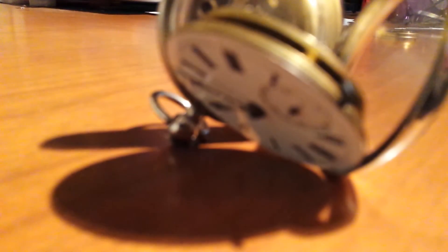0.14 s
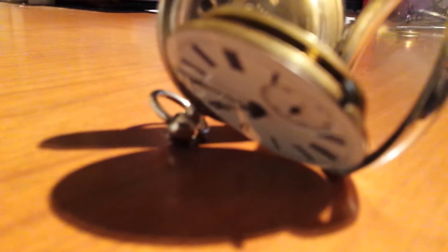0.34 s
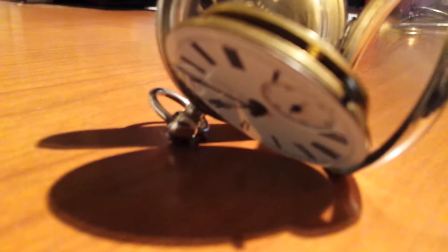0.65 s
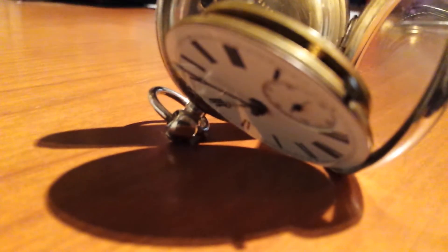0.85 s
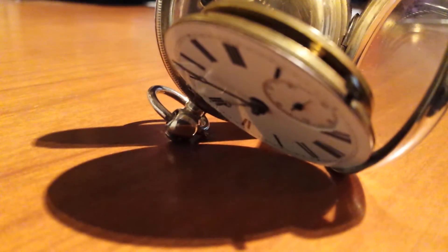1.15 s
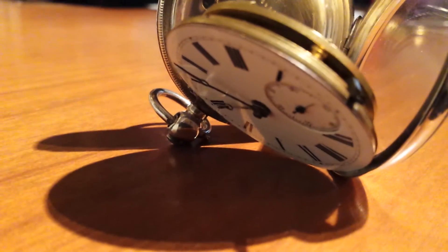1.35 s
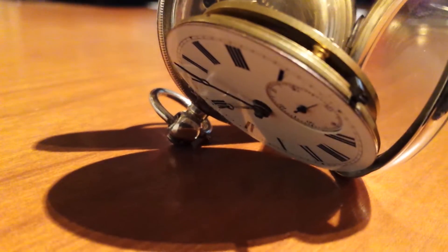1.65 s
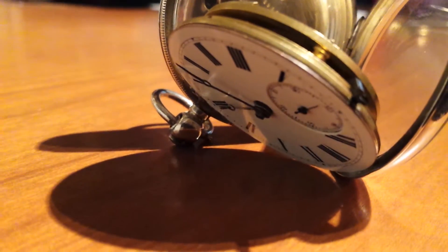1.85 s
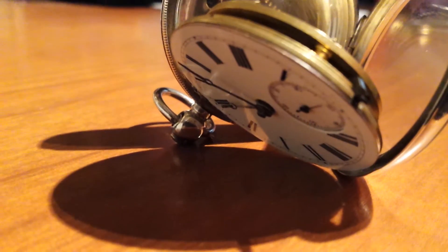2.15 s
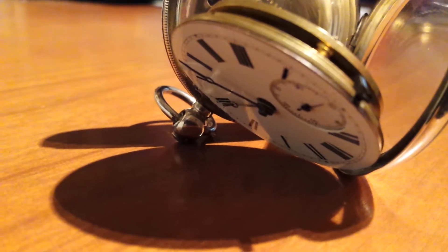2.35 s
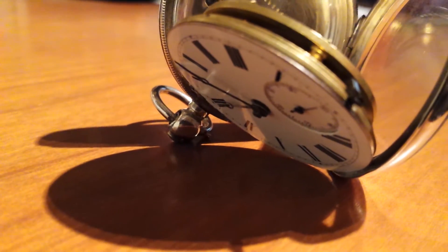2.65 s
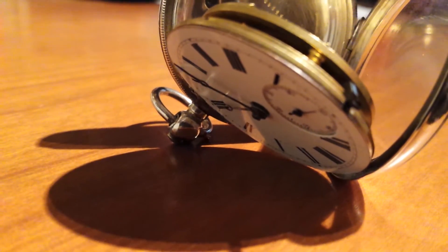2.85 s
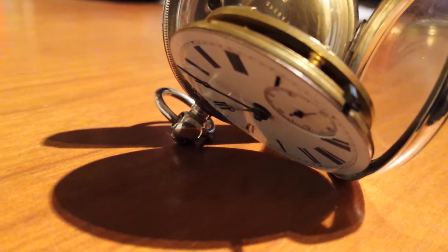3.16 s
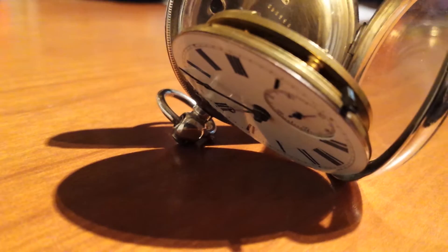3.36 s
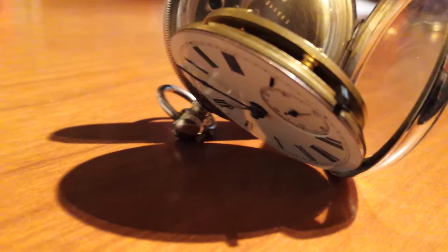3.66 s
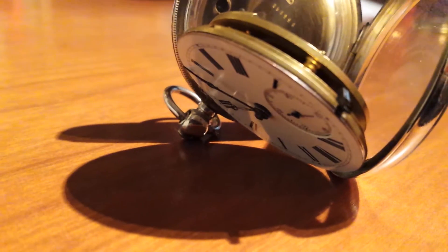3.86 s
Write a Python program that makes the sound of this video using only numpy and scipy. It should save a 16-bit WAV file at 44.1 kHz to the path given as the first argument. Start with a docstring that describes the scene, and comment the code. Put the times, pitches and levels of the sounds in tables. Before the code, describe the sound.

A mechanical pocket watch ticks steadily on a wooden table, close to the right microphone, in a quiet room; soft finger bumps, one dull knock midway, then rubbing and rustling of the grip near the end.

```python
"""A pocket watch ticks, almost wholly in the right channel: two pallets take turns to catch a wheel.
Each beat is unlock, impulse and drop, made of noise snaps and ringing tones; one pallet rebounds once,
the other chatters. Filtered bursts make a knock on a camera body, its recoil, a scrape and a tap, and soft
finger bumps; shaped noise makes brushing, rubbing and rustling. Beneath lie a faint whirr, room noise
and a distant hiss that sinks; watch and knocks leave a short room tail."""
import sys
import numpy as np
from scipy import signal
from scipy.fft import rfft, irfft
from scipy.io import wavfile

SR = 44100
rng = np.random.default_rng(int(sys.argv[2]) if len(sys.argv) > 2 else 0)


def inscribe(sig):
    """Save sig as 16-bit PCM at rate SR to the path in sys.argv[1].

    A 1-D sig is mono; a 2-D sig holds one channel per row.
    Samples are clipped to [-1, 1] before scaling.
    """
    pcm = np.round(np.clip(np.atleast_2d(sig).T, -1, 1) * 32767)
    wavfile.write(sys.argv[1], SR, pcm.astype(np.int16))


N = 176400  # length in samples: four seconds
SPECTRUM_HZ = np.fft.rfftfreq(4096, 1 / SR)  # frequencies at which short filters are drawn
NOISE_HZ = np.fft.rfftfreq(N, 1 / SR)  # frequencies of a full-length noise
T = np.arange(8192) / SR  # clock of one short sound, in seconds

# Steady noise of room and microphones: f/Hz, left level/dB per Hz, right level/dB per Hz
FLOOR_COLOUR = [(22.7, -99, -101), (45, -88.5, -85), (79, -86, -94), (170, -87, -89.5), (377, -95.5, -96.5),
                (630, -92, -97.5), (1220, -104, -104), (2200, -108, -110), (3720, -111, -111),
                (14500, -112, -111)]
# How alike the two channels of the background are: f/Hz, likeness (0 to 1)
FLOOR_LIKENESS = [(50, 0.62), (700, 0.29), (2000, 0.12), (5000, 0.017)]
FLOOR_FLUTTER_DB, FLUTTER_HZ = .6, 8  # the whirr wavers at the same rate
# Distant hiss before its level curve: f/Hz, left level/dB per Hz, right level/dB per Hz
DISTANT_COLOUR = [(200, -112, -116), (670, -101, -104), (1110, -100, -102), (1570, -102, -103),
                  (2510, -104, -107), (3400, -116, -118), (8000, -130, -130)]
# How the distant hiss sinks: t/s, level/dB
DISTANT_LEVEL = [(0, 0), (1.1, -1.5), (1.6, -7.5), (2.2, -5)]

WHIRR_DB, WHIRR_FLUTTER_DB = -72, 2.5
WATCH_LEFT_DB = -46  # the watch in the left channel, against the right

# First pallet's beats: drop t/s, level/dB before TICK_DB is added, unlock lead t/s,
# then against the drop: unlock level/dB, impulse level/dB, rebound lag t/s, rebound level/dB
TICKS = [(0.1515, -32, 0.037, -12, -9.5, 0.005, -7), (0.5935, -33, 0.039, -14.5, -7.5, 0.0068, -13),
         (1.0369, -32, 0.037, -15.5, -9, 0.011, -10), (1.479, -33.5, 0.039, -15.5, -7, 0.015, -11.5),
         (1.9226, -27.5, 0.039, -12.5, -9, 0.013, -9), (2.364, -27, 0.035, -6.5, -5, 0.014, -6),
         (2.807, -24.5, 0.0373, -17, -10, 0.01, -13), (3.2493, -25.5, 0.037, -11, -8, 0.014, -11),
         (3.6693, -22, 0.034, -13.5, -8.5, 0.014, -8.5)]
# Colour of the first pallet's blow: f/Hz, level/dB (only the shape counts)
TICK_COLOUR = [(1200, -50), (2500, -21.5), (3700, -25), (4600, -18), (5600, -12.5), (7000, 1), (7800, -3.5),
               (9200, -19.5), (10400, -18), (12300, -28.5), (14500, -25.5)]
TICK_DB, TICK_IMPULSE_LEAD_S = 18, .0198
TICK_SNAP_S, TICK_T60_S, TICK_SPREAD_DB = .0005, .024, 6
PING_HZ, PING_T60_S, PING_DB = 2460, .028, -26  # level against the drop

# Second pallet's beats: drop t/s, level/dB before TOCK_DB is added,
# chatter level/dB against the drop, before CHATTER_DB and the bounce losses
TOCKS = [(0.2845, -30, -10), (0.7282, -30.5, -7), (1.1705, -32.5, -4), (1.6143, -30.5, -7.5),
         (2.0566, -25, -5.5), (2.4993, -27, 5.5), (2.9427, -24, -5.5), (3.386, -20, -7),
         (3.8046, -19, -4.5)]
# Colour of the second pallet's blow: f/Hz, level/dB (only the shape counts)
TOCK_COLOUR = [(1000, -69), (2500, -53), (4100, -53), (4700, -11.5), (5600, -5), (7000, 12.5), (8200, 0.5),
               (9300, 0.5), (10800, -14.5), (12000, -26), (14500, -16)]
TOCK_DB, TOCK_SNAP_S, TOCK_T60_S, TOCK_SPREAD_DB = 15, .00018, .014, -6.5
TOCK_UNLOCK_LEAD_S, TOCK_UNLOCK_DB = .0325, -19.5
TOCK_IMPULSE_LEAD_S, TOCK_IMPULSE_DB = .0163, -16
CHATTER_GAP_S, CHATTER_SHRINK = .0038, .77  # first gap, and each next gap as a share of the last
CHATTER_DB, CHATTER_LOSS_DB = 3.5, 2.52  # shared level, and the loss with each bounce

# Ringing tones of the watch movement: f/Hz, 60 dB decay t/s,
# first pallet level/dB, second pallet level/dB, both against the snap and spread together
WATCH_MODES = [(4560, 0.06, -24.5, -27), (5510, 0.023, -13, -13.5), (5950, 0.014, -13, -17.5),
               (7027, 0.023, -2.5, -1), (7570, 0.029, -35, -9), (10550, 0.018, -19.5, -25),
               (7480, .3, -29, -27), (12700, .2, -43, -27.5)]

# Soft finger bumps: t/s, contact t/s, pitch f/Hz, level/dB, left minus right level/dB
BUMPS = [(0.348, 0.0013, 192, -22.5, 19), (0.43, 0.0023, 170, -27.5, 18), (.559, 0.0036, 327, -22, 27),
         (1.284, 0.0023, 110, -27.5, 21), (1.45, 0.0049, 306, -20, 25), (1.832, .003, 190, -27, 27),
         (2.977, 0.0038, 330, -25.5, 25), (3.372, 0.0089, 200, -18.5, -6.5), (3.386, 0.084, 98, -9, -22),
         (3.455, 0.12, 400, -12, -33), (3.582, 0.0085, 300, -6.5, -23), (3.605, 0.053, 360, -11.5, -33),
         (3.735, 0.0025, 135, -22, -22)]
# Colour of a bump: multiple of its pitch, level/dB (only the shape counts)
BUMP_SHAPE = [(.12, -34.5), (.55, -1.5), (1, 2.5), (1.5, 3.5), (2.6, -18), (6, -48.5), (20, -74)]

# Smooth brushing before its level curve: f/Hz, left level/dB per Hz, right level/dB per Hz
BRUSH_COLOUR = [(60, -80.5, -105), (200, -83.5, -81), (400, -87.5, -87.5), (680, -76, -87),
                (1020, -86, -94), (1540, -116, -99.5), (3200, -105, -103), (4660, -108, -102),
                (6800, -110, -86), (10300, -109, -102), (14500, -109, -105)]
# How the brushing comes and goes: t/s, level/dB
BRUSH_LEVEL = [(2.42, -23), (2.45, 8.5), (2.53, 3.5), (2.57, -23), (2.6, 2), (2.64, -22), (2.92, -24),
               (2.965, 1), (3, -7), (3.04, -4), (3.12, -14.5), (3.195, -16), (3.22, -6), (3.26, -4.5),
               (3.31, 3), (3.36, -15.5), (3.45, -24)]
BRUSH_FLUTTER_DB = 3

# Knock, recoil, scrape and tap: t/s, contact t/s,
# thud level/dB, hollow level/dB, clack level/dB, rattle level/dB
KNOCKS = [(2.449, 0.0056, 3, 1.5, -16.5, -0.5), (2.479, 0.00014, -28, -8.5, 2, 3.5),
          (3.213, 0.043, -38, -9, -27, -30), (3.947, 0.0013, -30, -19.5, -24, -32)]
# Dull thud of the camera body: f/Hz, left level/dB, right level/dB (shape and balance count)
THUD = [(25, -34, -41), (60.5, -30, -14.5), (105, -12.5, -0.5), (200, -14.5, -2), (300, -23, -14),
        (710, -38, -12), (1500, -52, -41), (5000, -77, -78)]
# Its hollow sound: f/Hz, left level/dB, right level/dB (shape and balance count)
HOLLOW = [(100, -32, -33), (360, -24, -12), (480, -3, -18), (713, 4, -4), (840, -12.5, -29),
          (1240, -25, -18), (4000, -72, -53)]
# Its sharper clack: f/Hz, left level/dB, right level/dB (shape and balance count)
CLACK = [(80, -29, -32), (268, 14.5, -25), (700, 10, 4), (1160, 14, 18), (1940, 13.5, 7.5), (2070, -7, 3),
         (3240, 5, -9), (5130, -32, -22), (12000, -49, -45)]
# Its bright rattle: f/Hz, left level/dB, right level/dB (shape and balance count)
RATTLE = [(1000, -60, -23), (2900, -45, -2.5), (3600, -23, -7.5), (4640, -23, -5.5), (6600, -40, 6.5),
          (8600, -49, 1.5), (11400, -51, -7.5), (14800, -40, -13)]
KNOCK_LAG_S = 0.00041  # a knock reaches the left microphone later

# Rubbing skin before its level curve: f/Hz, left level/dB per Hz, right level/dB per Hz
RUB_COLOUR = [(30, -93, -94), (135, -90.5, -74.5), (490, -83.5, -77), (710, -83.5, -83.5),
              (1380, -101, -84.5), (2180, -106, -90), (4300, -107, -99), (7050, -109, -89),
              (9600, -109, -100), (14300, -108, -102)]
# How the rubbing comes and goes: t/s, level/dB
RUB_LEVEL = [(3.19, -49), (3.215, -19), (3.34, -26), (3.385, -5), (3.5, 0.5), (3.56, -13), (3.59, 1),
             (3.66, 2.5), (3.71, -12), (3.79, -3), (3.86, -20), (4, -12.5)]
RUB_SLIPS_PER_S, RUB_SLIP_DB = 450, -3

# Bright treble during the rubbing before its level curve: f/Hz, left level/dB per Hz, right level/dB per Hz
RUSTLE_COLOUR = [(2490, -125, -120), (4200, -120, -109), (5640, -118, -93), (7000, -116, -88),
                 (8700, -116, -117), (10800, -116, -103), (14400, -116, -108)]
# How the rustle comes and goes: t/s, level/dB
RUSTLE_LEVEL = [(3.19, -30), (3.225, -21), (3.31, -10), (3.35, -20), (3.45, -23), (3.56, -6), (3.62, 2),
                (3.69, 5.5), (3.73, 0), (3.775, 9.5), (3.84, -38), (4, -2)]
RUSTLE_SLIPS_PER_S = 1200

# How fast the room tail dies: f/Hz, 60 dB decay t/s
ROOM_T60 = [(150, 0.9), (1000, 0.46), (7000, 0.28), (14000, 0.89)]
ROOM_WATCH_DB, ROOM_KNOCK_DB = -16.5, -18
CUTOFF_HZ = 14800


def amp(db):
    """Turns decibels into a gain."""
    return 10 ** (np.asarray(db) / 20)


def unit(x):
    """Scales a sound to a total energy of one."""
    return x / np.sqrt(np.sum(x ** 2) + 1e-20)


def dying(t, t60):
    """Gain of a ring that loses 60 dB in t60 seconds."""
    return amp(-60 * t / t60)


def read(table, hz):
    """Reads each column of a table at the given frequencies, evenly by pitch."""
    f, *columns = np.transpose(table)
    return np.array([np.interp(np.log(hz + 1e-6), np.log(f), c) for c in columns])


def add(mix, s, sound):
    """Mixes in a sound at s seconds, cut off at the end of the mix."""
    part = mix[..., round(s * SR):][..., :sound.shape[-1]]
    part += sound[..., :part.shape[-1]]


def response(db):
    """A filter of unit energy with the given spectrum, its energy as early as possible."""
    both_sides_db = np.concatenate([db, db[:, -2:0:-1]], axis=1)
    log_gain = np.log(amp(both_sides_db))
    return unit(np.fft.ifft(np.exp(np.conj(signal.hilbert(log_gain)))).real)


def noise():
    """Two separate channels of white noise."""
    return rng.standard_normal((2, N))


def coloured(x, table):
    """Gives white noise a spectrum in dB per Hz."""
    return irfft(rfft(x) * amp(read(table, NOISE_HZ)), N) * np.sqrt(SR / 2)


def flutter(depth_db, rate_hz):
    """A randomly wavering gain, with changes faster than rate_hz smoothed away."""
    smoothing = 1 + (NOISE_HZ / rate_hz) ** 2
    wobble = irfft(rfft(rng.standard_normal(N)) / smoothing, N)
    return amp(depth_db * unit(wobble) * np.sqrt(N))


def level(curve):
    """Gain along a level curve, practically silent before it starts."""
    return amp(np.interp(np.arange(N) / SR, *np.transpose(curve), left=-100))


def mode(hz, t60):
    """One dying tone of unit energy, starting at a random phase."""
    return unit(np.sin(2 * np.pi * (hz * T + rng.random())) * dying(T, t60))


def strike(body, snap_s, t60, spread_db, pallet):
    """Steel meets jewel: a snap, a dense spread of short rings, and the movement's main tones."""
    fades = [np.exp(-T / snap_s), dying(T, t60)]
    bursts = rng.standard_normal((2, len(T))) * fades
    snap, spread = signal.fftconvolve(bursts, body[None], axes=1)[:, :len(T)]
    ring = sum(amp(dbs[pallet]) * mode(hz, decay) for hz, decay, *dbs in WATCH_MODES)
    return unit(unit(unit(snap) + amp(spread_db) * unit(spread)) + ring)


def blow(body, contact_s):
    """A brief rough push and a click set a body sounding; total energy is one."""
    force = np.exp(-(T / contact_s) ** 2) * rng.standard_normal(len(T))
    push = unit(force) + .6 * (T == 0)
    return unit(signal.fftconvolve(push[None], body, axes=1)[:, :len(T)])


def slips(per_s):
    """Tiny random slips of skin as scattered clicks, at an average power of one."""
    return (rng.random((2, N)) < per_s / SR) * noise() * np.sqrt(SR / per_s)


def air():
    """Noise of unit power, partly shared by both channels."""
    left, other = rfft(noise())
    same = np.clip(read(FLOOR_LIKENESS, NOISE_HZ)[0], 0, 1)
    right = same * left + np.sqrt(1 - same ** 2) * other
    return irfft(np.array([left, right]), N)


def floor():
    """Low room noise and microphone hiss, wavering slightly."""
    return coloured(air() * flutter(FLOOR_FLUTTER_DB, FLUTTER_HZ), FLOOR_COLOUR)


def distant_hiss():
    """A distant hiss: shaped noise that sinks, then partly recovers."""
    return coloured(air() * level(DISTANT_LEVEL), DISTANT_COLOUR)


def whirr():
    """The swinging balance keeps the movement hissing faintly: noise through the tick's colour."""
    body = response(read(TICK_COLOUR, SPECTRUM_HZ))[0]
    hiss = signal.fftconvolve(rng.standard_normal(N), body)[:N]
    return amp(WHIRR_DB) * hiss * flutter(WHIRR_FLUTTER_DB, FLUTTER_HZ)


def ticks():
    """First pallet: unlock, impulse and drop, each with a faint low ping, then one rebound."""
    out = np.zeros(N)
    body = response(read(TICK_COLOUR, SPECTRUM_HZ))[0]
    for s, db, lead, unlock_db, impulse_db, lag, rebound_db in TICKS:
        drop_db = TICK_DB + db
        stages = [(-lead, unlock_db), (-TICK_IMPULSE_LEAD_S, impulse_db), (0, 0)]
        for offset, part_db in stages + [(lag, rebound_db)]:
            hit = strike(body, TICK_SNAP_S, TICK_T60_S, TICK_SPREAD_DB, pallet=0)
            add(out, s + offset, amp(drop_db + part_db) * hit)
        for offset, _ in stages:  # the ping is equally loud at each stage
            add(out, s + offset, amp(drop_db + PING_DB) * mode(PING_HZ, PING_T60_S))
    return out


def tocks(count=7):
    """Second pallet: faint unlock and impulse, then a drop that chatters in ever quicker bounces."""
    out = np.zeros(N)
    body = response(read(TOCK_COLOUR, SPECTRUM_HZ))[0]
    stages = [(-TOCK_UNLOCK_LEAD_S, TOCK_UNLOCK_DB), (-TOCK_IMPULSE_LEAD_S, TOCK_IMPULSE_DB), (0, 0)]
    k = np.arange(count)  # number of each bounce
    for s, db, chatter_db in TOCKS:
        unevenness = 1 + 0.046 * rng.standard_normal(count)
        lags = np.cumsum(CHATTER_GAP_S * CHATTER_SHRINK ** k * unevenness)
        bounce_dbs = CHATTER_DB + chatter_db - CHATTER_LOSS_DB * k
        for offset, part_db in stages + list(zip(lags, bounce_dbs)):
            hit = strike(body, TOCK_SNAP_S, TOCK_T60_S, TOCK_SPREAD_DB, pallet=1)
            add(out, s + offset, amp(TOCK_DB + db + part_db) * hit)
    return out


def bumps():
    """Fingers shift their grip: each soft bump is a rough push filtered around its own pitch."""
    out = np.zeros((2, N))
    for s, contact_s, hz, db, pan_db in BUMPS:
        sides = unit(amp([[pan_db], [0]]))
        body = response(read(BUMP_SHAPE, SPECTRUM_HZ / hz))
        add(out, s, amp(db) * sides * blow(body, contact_s))
    return out


def brushing():
    """Skin brushes smoothly, mostly on the left: wavering noise without separate slips."""
    brush = noise() * flutter(BRUSH_FLUTTER_DB, rate_hz=45)
    return coloured(brush * level(BRUSH_LEVEL), BRUSH_COLOUR)


def knock():
    """A dull knock on the camera body, its sharp recoil, and later a hollow scrape and a tap."""
    out = np.zeros((2, N))
    for s, contact_s, *levels in KNOCKS:
        for table, db in zip((THUD, HOLLOW, CLACK, RATTLE), levels):
            body = response(read(table, SPECTRUM_HZ))
            add(out, s, amp(db) * blow(body, contact_s))
    late_left = np.roll(out[0], round(KNOCK_LAG_S * SR))
    return np.array([late_left, out[1]])


def rubbing():
    """Skin sticks and slips near the right microphone: noise and clicks that waver together."""
    grains = amp(RUB_SLIP_DB) * slips(RUB_SLIPS_PER_S)
    grip = (amp(-0.5) * noise() + grains) * flutter(depth_db=-0.5, rate_hz=56)
    return coloured(grip * level(RUB_LEVEL), RUB_COLOUR)


def rustling():
    """A bright rustle rides on the rubbing: dense clicks over softer noise."""
    rustle = slips(RUSTLE_SLIPS_PER_S) + amp(-3) * noise()
    return coloured(rustle * level(RUSTLE_LEVEL), RUSTLE_COLOUR)


def room(x):
    """A short diffuse tail: noise in which each band dies at its own speed."""
    hz, t, bands = signal.stft(rng.standard_normal((2, SR // 2)), SR, nperseg=256)
    fading = bands * dying(t, read(ROOM_T60, hz).T)
    tail = signal.istft(fading, SR, nperseg=256)[1]
    return signal.fftconvolve(x, unit(tail) * np.sqrt(2), axes=1)[:, :N]


def scene():
    """Adds up background, watch, handling and the room tail of watch and knocks."""
    watch = (whirr() + ticks() + tocks()) * amp([[WATCH_LEFT_DB], [0]])
    knocked = knock()
    background = floor() + distant_hiss()
    handling = bumps() + brushing() + knocked + rubbing() + rustling()
    tail = room(amp(ROOM_WATCH_DB) * watch + amp(ROOM_KNOCK_DB) * knocked)
    return background + watch + handling + tail


def record(dry):
    """Cuts the treble above CUTOFF_HZ with a steep filter."""
    low_pass = signal.firwin(255, CUTOFF_HZ, window=("kaiser", 8), fs=SR)
    return signal.oaconvolve(dry, low_pass[None], "same")


dry = scene()
out = record(dry)
inscribe(out)
```